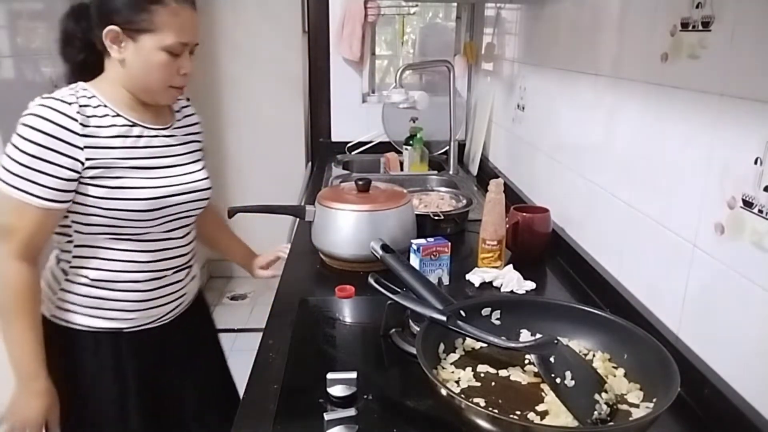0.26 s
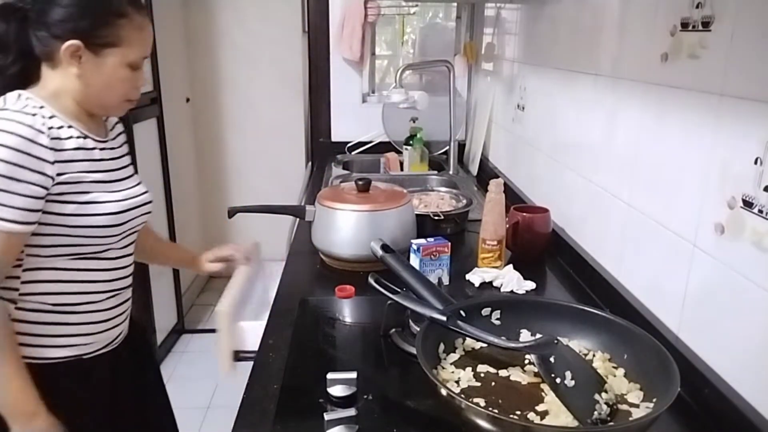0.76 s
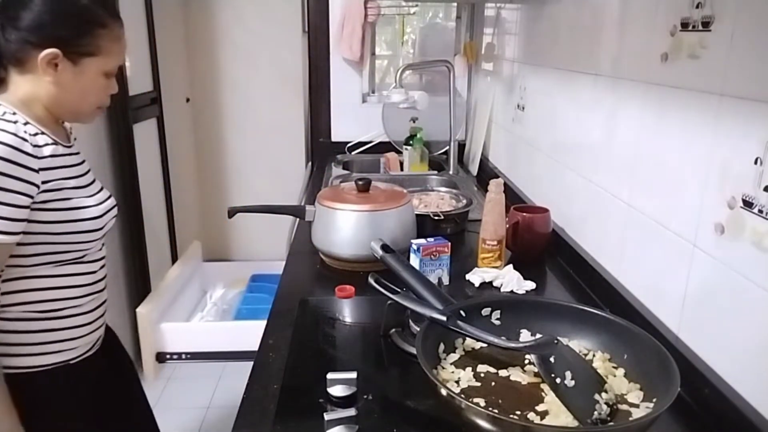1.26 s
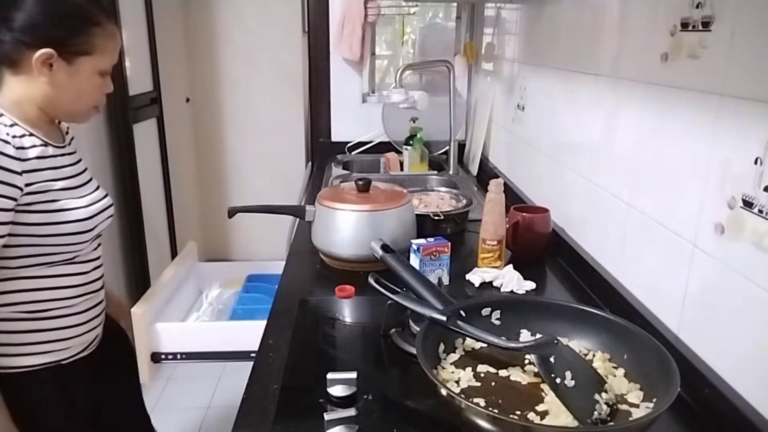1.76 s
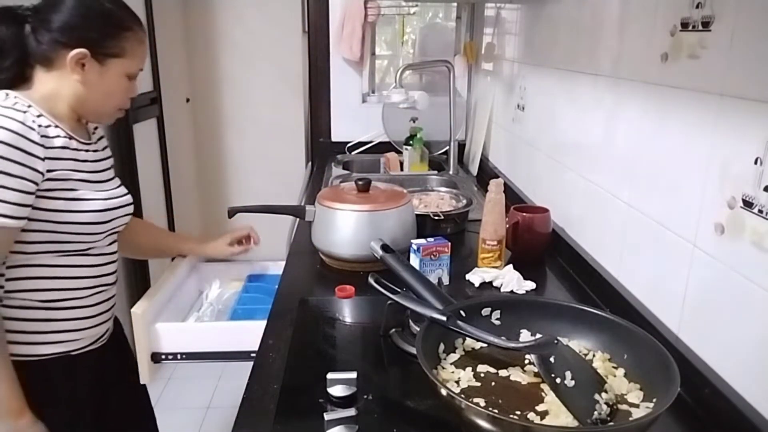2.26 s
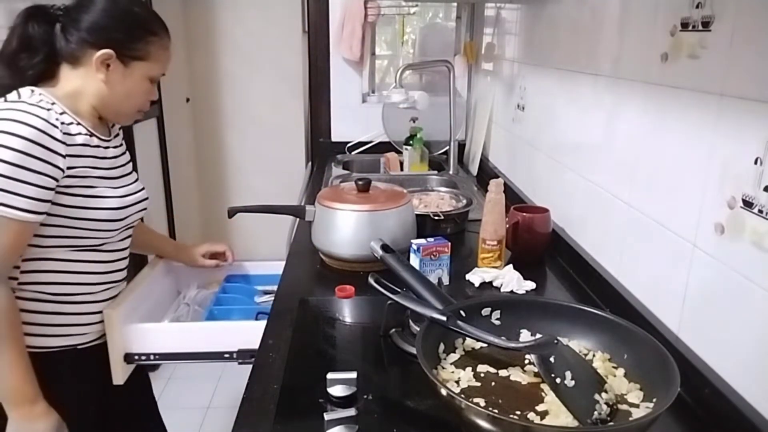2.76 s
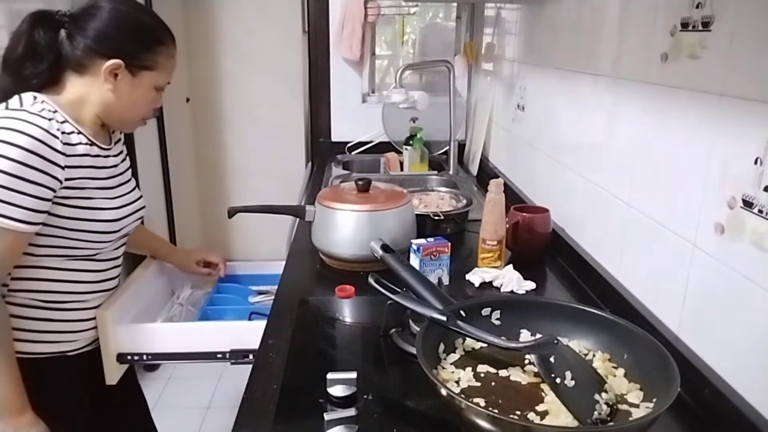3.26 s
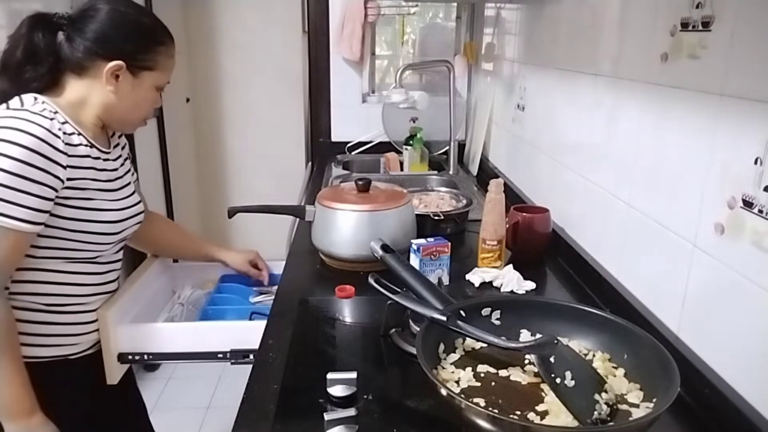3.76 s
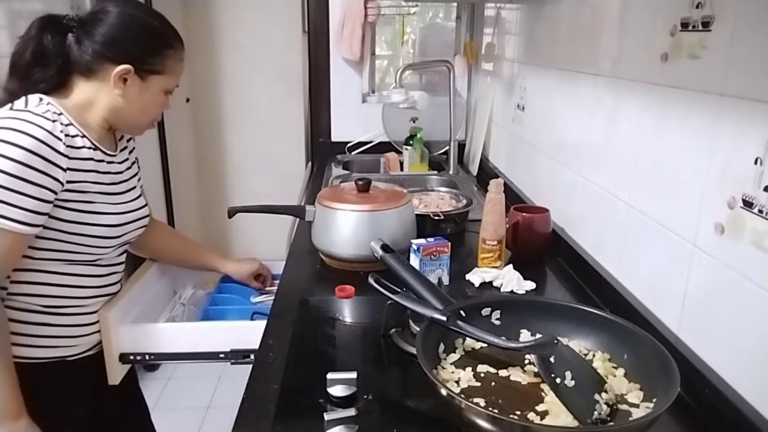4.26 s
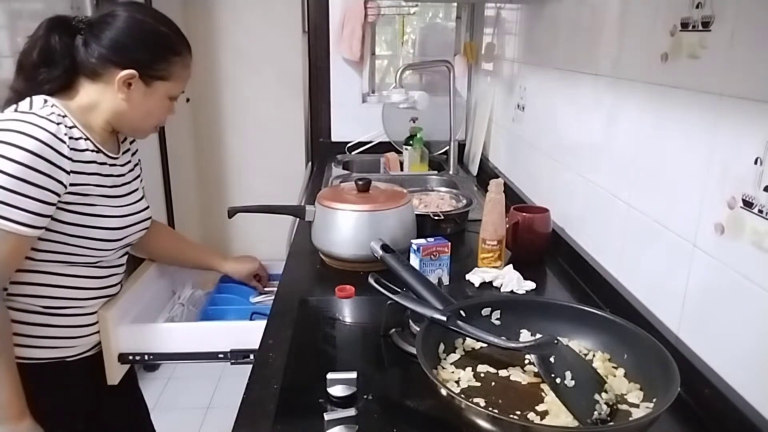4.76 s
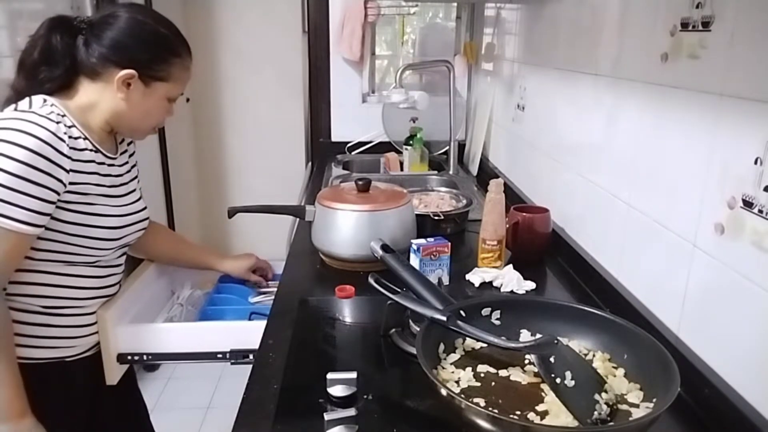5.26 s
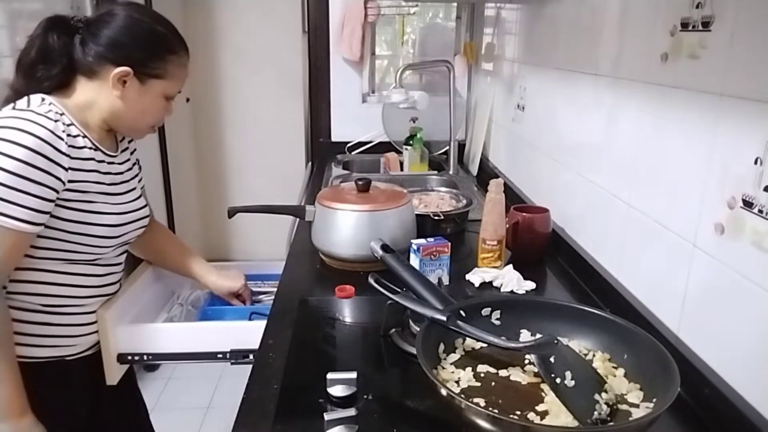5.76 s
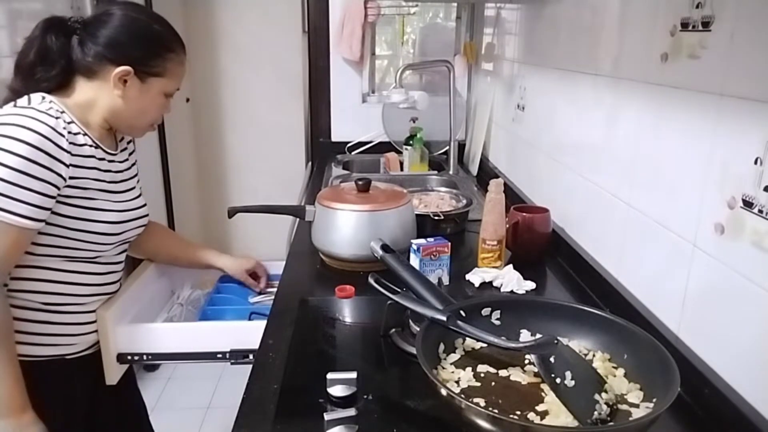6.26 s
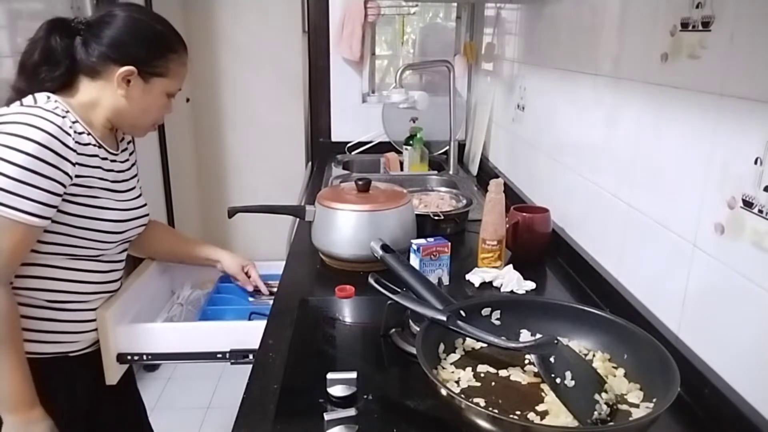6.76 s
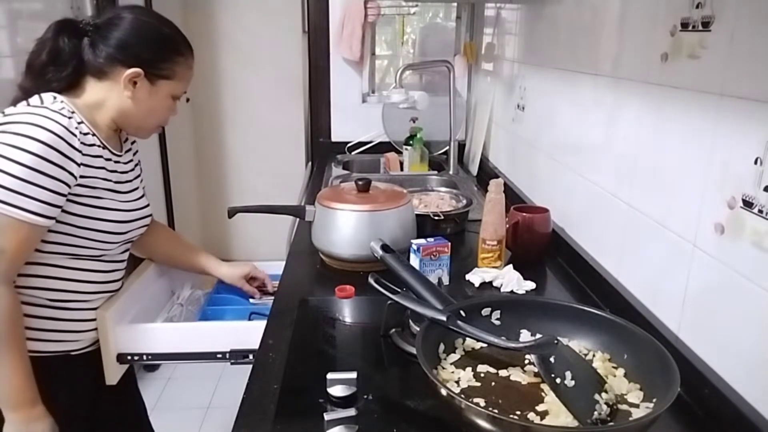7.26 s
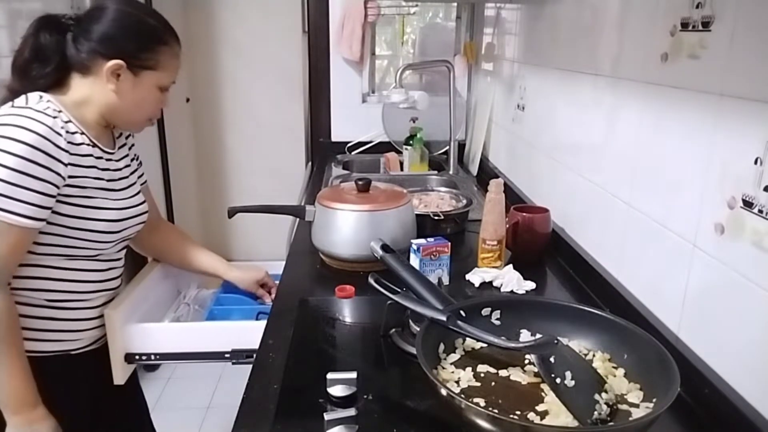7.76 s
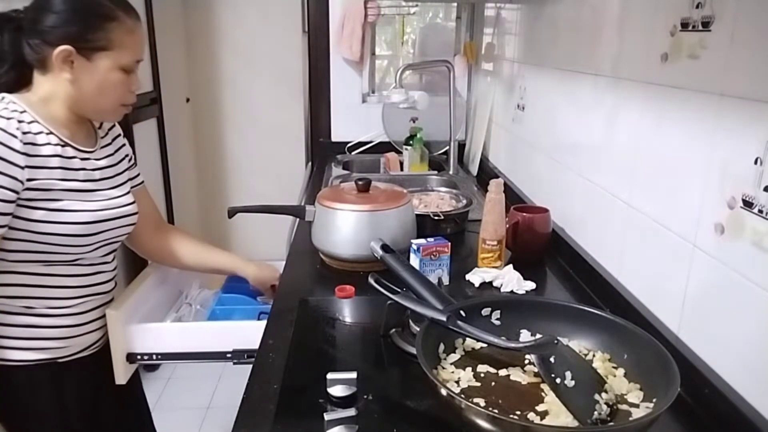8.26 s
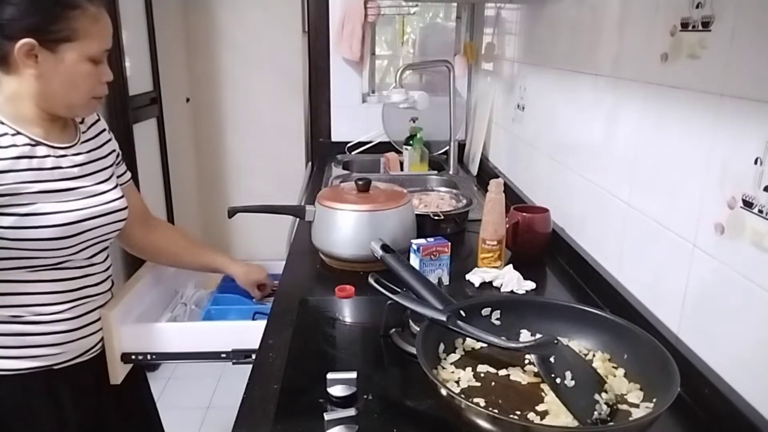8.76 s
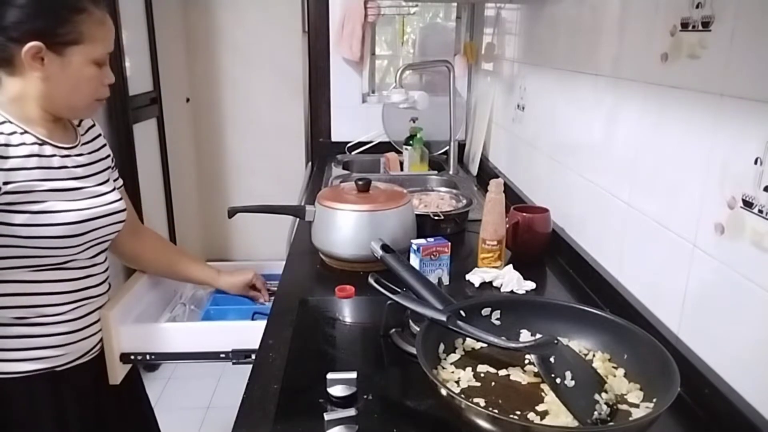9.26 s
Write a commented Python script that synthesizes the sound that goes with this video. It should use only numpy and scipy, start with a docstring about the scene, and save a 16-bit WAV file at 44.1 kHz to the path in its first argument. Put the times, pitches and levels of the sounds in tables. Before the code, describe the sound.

A wooden drawer's runners scrape and rumble briefly, then only gentle frying crackle and room rush remain. Spoons, forks and knives are then picked through in a hollow plastic tray, with quick rebounding clacks, short bright rings and light dragging. The loudest clatters come before the middle and about two thirds through. Short hard-walled kitchen echo; the frying is closer to the microphone but faint.

```python
"""A hand rummages through steel cutlery in the plastic tray of a kitchen drawer it has just rolled open.
Every contact is struck noise plus decaying sines in three layers: tray, drawer and ringing steel.
Random clicks, coloured and echoed by a small tiled room, make the rolling runners and dragged cutlery.
Close by, garlic sizzles quietly in a frying pan: fizz, crackles and spits that ring the pan's bowl.
The low rush of the room lies beneath."""
import sys
import numpy as np
from scipy import signal
from scipy.fft import rfft, irfft, next_fast_len
from scipy.io import wavfile

SR = 44100
rng = np.random.default_rng(int(sys.argv[2]) if len(sys.argv) > 2 else 0)


def to_wav(s):
    """Save 16-bit WAV."""
    ch = np.atleast_2d(s).T  # columns
    pcm = np.round(np.clip(ch, -1, 1) * 32767)  # PCM
    wavfile.write(sys.argv[1], SR, pcm.astype(np.int16))


N = 418905

# Lengths in samples: a whole hit, its ringing part, the first 40 ms by which hits are levelled
HIT_SIZE, RING_SIZE, LEVEL_SIZE = 18000, 14000, 1764
HIT_TIME = np.arange(HIT_SIZE) / SR

# Room and output
KITCHEN_T60_S, WALL_ECHO_S = 0.33, 0.012
CUTOFF_HZ = 15600
# Spectrum of the room's low rush: pitch_hz [Hz], level_db [dB, relative]
ROOM_TONE_COLOUR = [(12, -57), (20, -18), (103, -5), (163, -5), (245, -4.5), (449, -11), (744, -9),
                    (874, -11.5), (1390, -14), (1510, -21), (1640, -13.5), (1960, -22.5), (2500, -16.5),
                    (3250, -43), (5500, -120)]
ROOM_TONE_DB = -60.5

# Resonances of the pan's bowl: pitch_hz [Hz], width_hz [Hz], level_db [dB, relative]
PAN_MODES = [(3325, 120, 7), (4054, 130, 4.5), (4860, 120, 5), (6030, 200, 3), (6470, 130, 3),
             (6900, 150, 3), (7320, 150, 5)]
# Spectrum of the frying: pitch_hz [Hz], level_db [dB, relative]
SIZZLE_COLOUR = [(1200, -3), (2100, -16), (2700, -4), (3600, -3), (5200, -5), (6400, -2.5), (7500, -1),
                 (8300, -7), (9300, -20), (12000, -12), (13500, -12), (15300, -7)]
# Spits of oil at set times: start_s [s], level_db [dB, before the spit trim], pitch_hz [Hz]
SET_SPITS = [(1.675, -39, 3520), (1.76, -42, 7310), (2.4073, -34, 6500), (3.31, -40.5, 7200),
             (3.97, -36, 6150), (4.454, -39.5, 4850), (4.582, -44, 4080), (7.6842, -40.5, 3330),
             (7.947, -39.5, 7310), (9.457, -42, 7200)]
# Further spits at random times: mean level and its spread, before the spit trim
RANDOM_SPIT_DB, RANDOM_SPIT_SPREAD_DB = -42, 0.4
SPIT_TRIM_DB = -8.0

# Runners as the drawer is pulled open: start_s [s], level_db [dB, before the rumble and rail trims]
ROLL = [(0.2, -81), (0.322, -48), (0.606, -51.5), (0.642, -41), (0.836, -46.5), (0.864, -52), (0.9, -50),
        (1.1, -78)]
# Spectrum of the rolling: pitch_hz [Hz], level_db [dB, relative]
ROLL_COLOUR = [(90, -3), (150, -22), (220, 8), (290, 5.5), (370, -1.5), (470, -12.5), (620, -5),
               (950, -31.5), (1500, -41), (2400, -42), (4000, -59)]
# A later nudge a little further: start_s [s], length_s [s, before its release], level_db [dB, as in ROLL]
NUDGE = (2.5, .07, -54)
# Runners scrape as the drawer breaks free: start_s [s], length_s [s, before its release], level_db [dB]
SCRAPE = (.25, 0.046, -57)
# Spectrum of the scrape: pitch_hz [Hz], level_db [dB, relative]
SCRAPE_COLOUR = [(500, 0), (750, 8.5), (1050, 4), (1500, -6), (1900, -6), (2300, -8), (3200, -28)]
RUMBLE_DB, RAIL_DB = -2.5, -17.5   # roller rumble and rail hiss, relative to the runners
# The drawer jolts on its rollers: start_s [s], level_db [dB], pitch_hz [Hz]
JOLTS = [(.33, -46, 214), (.635, -54, 256), (0.904, -50.5, 237), (5.995, -52.5, 260)]
# Further roller bumps at random times: level relative to ROLL, and middle pitch
BUMP_DB, BUMP_HZ = -6, 264.4

# Clear tones of single parts that ring on alone: start_s [s], pitch_hz [Hz], level_db [dB], t60_s [s]
LOOSE_RINGS = [(.79, 917, -42.5, 0.084), (1.205, 1026, -51.5, 0.36), (1.205, 483, -54, 0.27),
               (2.411, 5940, -43, 0.13), (3.606, 1466, -28, 0.073), (3.609, 7750, -31, 0.18),
               (4.891, 908, -37, 0.18), (4.892, 2280, -46.5, 0.14), (5.752, 5470, -40.5, 0.14),
               (5.768, 699, -30.5, 0.29), (6.408, 7370, -26, 0.34), (6.487, 8857, -37, 0.45),
               (6.526, 1140, -27.5, 0.29), (6.589, 3885, -31.5, 0.35), (6.66, 1440, -42, 0.82),
               (7.392, 497, -26, 0.2), (8.236, 3860, -39, 0.23), (8.349, 4020, -45, 0.33)]
# Soft knocks of a handle rocking on the tray: start_s [s], level_db [dB], pitch_hz [Hz]
SOFT_KNOCKS = [(3.954, -49.5, 780), (4.286, -48, 737), (4.321, -46.5, 756), (4.331, -49, 890),
               (5.352, -37, 763), (6.895, -51.5, 734), (6.929, -52, 695), (7.051, -40.5, 764)]

# The hand drags cutlery over the tray: start_s [s], length_s [s, before release],
# level_db [dB, before the slip and graze trims]
STROKES = [(3.807, 0.27, -37.5), (4.42, 0.21, -46), (6.7, 0.43, -48.5), (7.5, 0.15, -51), (8.86, 0.76, -49)]
STROKE_ATTACK_S, STROKE_RELEASE_S = 0.067, 0.21
SLIP_DB, GRAZE_DB = -11, -15.5   # handles on plastic, steel on steel
GRAZE_HARDNESS_HZ = 6760

# Modes of the plastic tray: pitch_hz [Hz], level_db [dB, relative], t60_s [s]
TRAY_MODES = [(490, 6.5, 0.082), (593.5, -1.5, 0.46), (759, 2.5, 0.37), (805, 2, 0.088), (883, -2, 0.12),
              (925, 1, 0.26), (1163, -8.5, 0.14), (1167, 3, 0.3), (1192, 2, 0.23), (1464, 13, 0.17),
              (1508, 11, 0.091)]
# Modes of the wooden drawer: pitch_hz [Hz], level_db [dB, relative], t60_s [s]
DRAWER_MODES = [(194, -6, 0.28), (234, 8, 0.085), (347, 2, 0.15), (429.5, 6, 0.32)]
# Modes of a spoon: pitch_hz [Hz], level_db [dB, relative], t60_s [s]
SPOON = [(2485, -7, 0.099), (3020, -10, 0.17), (3470, -25, .2), (4070, -9, 0.2), (5930, 8, 0.037),
         (5916, -12, 0.23), (7310, -19, .25), (7720, -2, 0.2), (8200, -13, 0.11), (9800, -15, 0.091),
         (11900, -19, 0.2), (15120, -12, .12)]
# Modes of a fork: pitch_hz [Hz], level_db [dB, relative], t60_s [s]
FORK = [(2360, 5, 0.098), (2920, -1, 0.28), (3800, 0, 0.31), (4030, -19, .3), (5700, -10, 0.18),
        (8200, -17, .3), (10440, -9, 0.27), (10885, -21, .35), (11600, -9, .3), (15200, -5, .2)]
# Modes of a knife: pitch_hz [Hz], level_db [dB, relative], t60_s [s]
KNIFE = [(2360, 1.5, 0.12), (2920, -19, 0.38), (3700, -2, 0.41), (4040, 2, 0.1), (4200, -3, 0.16),
         (5660, -1, 0.35), (6700, -21, 0.13), (7200, 0, .2), (11900, -29, 0.11), (11900, -7, .2),
         (12740, -17, 0.19), (14680, -13, 0.18), (15190, -8, .22)]
# Modes of a heap of cutlery: pitch_hz [Hz], level_db [dB, relative], t60_s [s]
HEAP = [(2400, -11, .25), (2690, -10, .25), (3690, -6, .28), (3924, -1, .33), (4172, -7, .28),
        (5211, -5, .3), (5803, -5, .28), (6610, -5, .3), (7364, -3, .27), (7504, -7, .27), (8860, -9, .2),
        (11680, -8, .25), (12736, -9, .25), (13856, -9, .25), (14147, -8, .3), (14642, -5, .2),
        (15191, -8, .2)]
# What the hand is moving: start_s [s], modes [a mode table above]
IN_HAND = [(0, SPOON), (5, FORK), (6.2, HEAP), (7, KNIFE)]
# Contact hardness for each row of IN_HAND: cutoff_hz [Hz]
HARDNESS_HZ = [6700, 13000, 19000, 15500]
# Crowd of damped modes in the drawer: pitch_hz [Hz], level_db [dB, relative]
DRAWER_CLACK = [(90, -39), (140, -37), (185, 6), (260, -12.5), (350, 14), (440, -3), (540, -20), (800, -47)]
# Crowd of damped modes in the tray: pitch_hz [Hz], level_db [dB, relative]
TRAY_CLACK = [(300, -2), (460, -1), (600, 0.5), (770, 4.5), (1050, -1.5), (1200, -3.5), (1600, -3.5),
              (1900, -5), (2600, -46)]
# Crowd of damped modes in the steel: pitch_hz [Hz], level_db [dB, relative]
STEEL_CLACK = [(1300, 4), (2000, -4.5), (2450, 3), (3100, -2), (3900, 4.5), (4900, -4.5), (6300, -2),
               (7500, -1.5), (8400, -6.5), (9500, -19.5), (10800, -16.5), (11800, -9), (13000, -10),
               (15200, -7.5)]
# A piece drops or is pushed: start_s [s], tray_db, drawer_db, steel_db [dB, before the material trims],
# knock_hz [Hz, centre of the first knock], settle_s [s, until the last rebound]
CLATTERS = [(3.606, -33.5, -57, -40, 1240, 0.048), (3.682, -35, -54, -48, 880, .011),
            (3.698, -26.5, -52, -33.5, 960, .02), (3.71, -21, -42, -30, 990, 0.019),
            (3.743, -27.5, -54, -37.5, 830, 0.027), (4.028, -37, -63, -40, 920, .05),
            (4.215, -45.5, -75, -51.5, 900, 0.041), (4.858, -49, -65, -56, 970, .02),
            (4.892, -42.5, -71, -53.5, 1070, 0.055), (5.738, -44, -52, -59, 880, .012),
            (5.753, -42.5, -53, -45.5, 800, .01), (5.768, -35.5, -55, -44, 795, 0.037),
            (6.333, -42.5, -56, -55.5, 900, 0.032), (6.382, -38.5, -58, -46, 820, 0.015),
            (6.4, -23, -38, -29.5, 830, 0.015), (6.413, -29, -35, -26.5, 860, 0.039),
            (6.457, -32, -37.5, -36.5, 775, .02), (6.486, -29.5, -43, -32.5, 1010, 0.032),
            (6.526, -24, -37, -29.5, 850, 0.022), (6.561, -27, -34.5, -27.5, 860, .02),
            (6.59, -31, -41, -35, 870, 0.038), (6.653, -31, -52, -38, 940, 0.041),
            (7.143, -43.5, -47, -53, 955, 0.033), (7.28, -48, -54, -50, 1250, .02),
            (7.326, -41, -49, -46.5, 950, 0.023), (7.359, -35.5, -51, -37, 930, 0.026),
            (7.392, -25, -34, -36, 895, .014), (7.464, -41.5, -60, -62, 830, 0.054),
            (7.526, -43.5, -53, -57.5, 740, 0.058), (7.703, -45, -52.5, -50.5, 1000, 0.05),
            (8.056, -45.5, -58.5, -54.5, 1210, 0.012), (8.207, -42.5, -46, -47, 965, 0.016),
            (8.235, -34, -40.5, -40, 950, 0.023), (8.349, -33.5, -44.5, -39, 1030, 0.041),
            (8.513, -37, -48, -40, 850, 0.028), (8.572, -47, -55, -50, 790, .015),
            (9.089, -44.5, -58, -53.5, 880, .03), (9.135, -48, -60, -53.5, 890, .025),
            (9.233, -49.5, -58, -58, 940, 0.031), (9.303, -42, -54.5, -44.5, 850, 0.013),
            (9.314, -40.5, -66, -45, 1120, 0.027)]
# Mean loss at each rebound: tray_db, drawer_db, steel_db [dB]
REBOUND_LOSS_DB = [4.5, 4.5, 4.5]
REBOUND_GAP_SHARE = .75   # each gap as a share of the one before, on average
REBOUND_SPREAD_DB = 1
KNOCK_SPREAD_OCTAVES = 0.27   # a rebound lands on another spot of the tray
STEEL_RING_DB, STEEL_NEIGHBOURS_DB = -4, -2   # own modes and neighbours' modes, relative to the clack


def from_db(db):
    """Decibels to gain."""
    return 10 ** (np.asarray(db) / 20)


def rms_one(x, size=None):
    """Scale so that the first size samples have rms 1."""
    return x / np.sqrt(np.mean(x[:size] ** 2) + 1e-20)


def decay(t60):
    """An envelope that falls 60 dB in t60 seconds."""
    return from_db(-60 * HIT_TIME / max(t60, 1e-3))


def add(track, start_s, sound):
    """Mix a sound into the track from start_s seconds on."""
    at = max(int(start_s * SR), 0)
    track[at:at + len(sound)] += sound[:N - at]


def hit_noise():
    """White noise as long as one hit."""
    return rng.standard_normal(HIT_SIZE)


def colour(x, spectrum, emphasis=np.ones_like):
    """Filter a sound to a spectrum of (Hz, dB) points, times a gain that depends on frequency."""
    size = next_fast_len(len(x))
    hz = np.maximum(np.fft.rfftfreq(size, 1 / SR), 1)
    points, levels = np.transpose(spectrum)
    above_db = levels[-1] if points[-1] > 1e4 else -80
    level_db = np.interp(np.log(hz), np.log(points), levels, left=-70, right=above_db)
    return irfft(rfft(x, size) * from_db(level_db) * emphasis(hz), size)[:len(x)]


def hump(hz, centre_hz, octaves):
    """A broad resonance on a log-frequency axis."""
    return 1 / np.sqrt(1 + (np.log2(hz / centre_hz) / octaves) ** 4)


def grains(per_s, spread_db):
    """Random clicks of either polarity, of uneven size where spread_db is above zero."""
    swell = np.minimum(rng.exponential(1, N), 5)
    sizes = from_db(spread_db * swell) * rng.choice([-1, 1], N)
    return sizes * (rng.random(N) < per_s / SR)


def level_curve(rows):
    """Gain over time from (s, dB) rows, silent outside them."""
    start_s, level_db = np.transpose(rows)
    return np.interp(np.arange(N) / SR, start_s, from_db(level_db), left=0, right=0)


def push(start_s, length_s, level_db, attack_s, release_s):
    """Gain of one movement: it gathers speed, holds until its length is over and runs out."""
    t = np.arange(N) / SR - start_s
    gather = np.clip(t / attack_s, 0, 1)
    run_out = np.clip(1 - (t - length_s) / release_s, 0, 1)
    return from_db(level_db) * gather * run_out


def kitchen(x, wet_db):
    """Direct sound plus the diffuse echo of the tiled walls, as decaying noise."""
    echo = hit_noise() * decay(KITCHEN_T60_S) * (1 - decay(0.0051))
    wet = signal.fftconvolve(x, echo / np.linalg.norm(echo))[:len(x)]
    return x + from_db(wet_db) * wet


def wall_echo(x, echo_db):
    """The facing wall returns one distinct reflection."""
    out = x.copy()
    add(out, WALL_ECHO_S, from_db(echo_db) * x)
    return out


def chime(modes, emphasis, spread_db):
    """Decaying sines; each spot that is struck favours other modes."""
    hz, level_db, t60 = np.transpose(modes)
    strength = from_db(level_db + spread_db * rng.standard_normal(len(hz))) * emphasis(hz)
    t = HIT_TIME[:RING_SIZE].astype(np.float32)
    fade_rate = np.log(1000) / np.maximum(t60, .01)
    phases = 2 * np.pi * rng.random(len(hz))
    # One row per mode; single precision keeps it quick
    turn, fade, phase = np.float32([2 * np.pi * hz, fade_rate, phases])[:, :, None]
    ring = strength.astype(np.float32) @ (np.sin(turn * t + phase) * np.exp(-fade * t))
    return rms_one(np.pad(ring, (0, HIT_SIZE - RING_SIZE)), size=LEVEL_SIZE)


def room_rush():
    """The low rush of the room: steady noise with a dark spectrum."""
    return from_db(ROOM_TONE_DB) * rms_one(colour(rng.standard_normal(N), ROOM_TONE_COLOUR))


def pan_resonance(hz):
    """Gain of the pan's ringing bowl: a sum of narrow resonance peaks."""
    gain = 1
    for centre_hz, width_hz, level_db in PAN_MODES:
        gain = gain + (from_db(level_db) - 1) / (1 + (2 * (hz - centre_hz) / width_hz) ** 2)
    return gain


def sizzle_fizz():
    """Dense equal clicks of bursting bubbles, gently tinted by the pan."""
    tint = lambda hz: np.sqrt(pan_resonance(hz))
    return rms_one(colour(grains(per_s=5000, spread_db=0.0), SIZZLE_COLOUR, tint))


def sizzle_crackle():
    """Sparser uneven pops in nine pitch bands, ringing the pan and the room."""
    crackle = np.zeros(N)
    for centre_hz in np.geomspace(2800, 8500, num=9):
        band = lambda hz: pan_resonance(hz) * hump(hz, centre_hz, octaves=.25)
        pops = colour(grains(per_s=35, spread_db=2.6), SIZZLE_COLOUR, band)
        crackle += kitchen(pops, wet_db=3.0)
    return rms_one(crackle)


def random_spits(count):
    """Further spits at random times, each on one pan resonance: rows of start_s, level_db, pitch_hz."""
    start_s = (np.arange(count) + rng.random(count)) / count * N / SR
    level_db = RANDOM_SPIT_DB + RANDOM_SPIT_SPREAD_DB * rng.standard_normal(count)
    pitch_hz = rng.choice([hz for hz, _, _ in PAN_MODES], count)
    return list(zip(start_s, level_db, pitch_hz))


def oil_spits():
    """Each spit is a short noise burst that rings the bowl around its own pitch."""
    spits = np.zeros(N)
    for start_s, level_db, pitch_hz in SET_SPITS + random_spits(count=22):
        pitched = lambda hz: hump(hz, pitch_hz, octaves=0.43)
        burst = rms_one(colour(hit_noise(), SIZZLE_COLOUR, pitched) * decay(0.057), size=LEVEL_SIZE)
        bowl_modes = [(hz, mode_db, .07) for hz, _, mode_db in PAN_MODES]
        bowl = chime(bowl_modes, pitched, spread_db=7.0)
        spit = (burst + from_db(2.5) * bowl) * (1 - decay(0.0044))
        # Levelled over its first 6 ms
        add(spits, start_s, from_db(level_db + SPIT_TRIM_DB) * rms_one(spit, size=264))
    return kitchen(spits, wet_db=-9.0)


def frying():
    """Garlic in the pan: a fine fizz, sparser crackles and single spits of oil."""
    return from_db(-60.5) * sizzle_fizz() + from_db(-59.5) * sizzle_crackle() + oil_spits()


def runners():
    """Rollers rumble and hiss along the rails as dense clicks; at first the rails scrape."""
    rumble = rms_one(kitchen(colour(grains(per_s=600, spread_db=3.5), ROLL_COLOUR), wet_db=0))
    scrape = rms_one(kitchen(colour(grains(per_s=230, spread_db=3.5), SCRAPE_COLOUR), wet_db=6))
    rolling = level_curve(ROLL) + push(*NUDGE, attack_s=0.043, release_s=.08)
    scraping = from_db(RAIL_DB) * rolling + push(*SCRAPE, attack_s=0.048, release_s=0.29)
    return from_db(RUMBLE_DB) * rolling * rumble + scraping * scrape


def bumps(count):
    """Roller bumps at random times, as hard as the drawer runs: rows of start_s, level_db, pitch_hz."""
    times, levels = np.transpose(ROLL)
    start_s = times[0] + (times[-1] - times[0]) * (np.arange(count) + rng.random(count)) / count
    level_db = np.interp(start_s, times, levels) + BUMP_DB
    pitch_hz = BUMP_HZ * 2 ** (0.23 * rng.standard_normal(count))
    return list(zip(start_s, level_db, pitch_hz))


def jolts():
    """The drawer box booms briefly at each jolt: three low, fast-fading modes."""
    out = np.zeros(N)
    for start_s, level_db, pitch_hz in JOLTS + bumps(count=12):
        box_modes = [(pitch_hz, 0, .11), (pitch_hz * 1.45, -9, .09), (pitch_hz * .68, -11, .1)]
        boom = chime(box_modes, np.ones_like, spread_db=3.5) * (1 - decay(0.039))
        add(out, start_s, from_db(level_db) * rms_one(boom, size=LEVEL_SIZE))
    return out


def loose_rings():
    """Single decaying sines from the rails and from pieces left free to swing."""
    out = np.zeros(N)
    for start_s, pitch_hz, level_db, t60 in LOOSE_RINGS:
        envelope = decay(t60) * (1 - decay(0.004)) ** 3   # soft onset
        add(out, start_s, from_db(level_db) * np.sin(2 * np.pi * pitch_hz * HIT_TIME) * envelope)
    return out


def soft_knocks():
    """A blunt touch wakes one panel of the tray, with a weak overtone and a faint tick of steel."""
    out = np.zeros(N)
    for start_s, level_db, pitch_hz in SOFT_KNOCKS:
        panel_modes = [(pitch_hz, 0, .05), (pitch_hz * 1.78, -12, .05)]
        panel = chime(panel_modes, np.ones_like, spread_db=0.0)
        near_pitch = lambda hz: hump(hz, pitch_hz, octaves=0.32)
        tail = rms_one(colour(hit_noise(), TRAY_CLACK, near_pitch) * decay(0.24), size=LEVEL_SIZE)
        tick = rms_one(colour(hit_noise(), STEEL_CLACK) * decay(0.098), size=LEVEL_SIZE)
        knock = rms_one((panel + from_db(-11) * tail) * (1 - decay(.035)), size=LEVEL_SIZE)
        add(out, start_s, from_db(level_db) * (knock + from_db(-19.0) * tick))
    return wall_echo(out, echo_db=-9.0)


def dragging():
    """Handles stick and slip on the plastic and graze one another, as two streams of clicks."""
    effort = sum(push(*stroke, STROKE_ATTACK_S, STROKE_RELEASE_S) for stroke in STROKES)
    slips = rms_one(kitchen(colour(grains(per_s=440, spread_db=4.0), TRAY_CLACK), wet_db=6.5))
    soft = lambda hz: 1 / np.hypot(1, (hz / GRAZE_HARDNESS_HZ) ** 2)
    grazes = rms_one(kitchen(colour(grains(per_s=120, spread_db=1.6), STEEL_CLACK, soft), wet_db=3))
    return effort * (from_db(SLIP_DB) * slips + from_db(GRAZE_DB) * grazes)


def chance_modes(spectrum, count, t60):
    """Modes of whatever else is touched: random pitches, as strong as the spectrum there."""
    points, levels = np.transpose(spectrum)
    pitches = rng.uniform(points[1], points[-2], count)
    fades_s = t60 * rng.uniform(.6, 1.4, count)
    return list(zip(pitches, np.interp(pitches, points, levels), fades_s))


def strike(spectrum, modes, emphasis, ring_db, others_db, clack_t60, room_db, rise_s, count):
    """One blow: a noisy clack with its room tail, the body's own modes and those of its neighbours."""
    envelope = np.hypot(decay(clack_t60), from_db(room_db) * decay(KITCHEN_T60_S))
    clack = rms_one(colour(hit_noise(), spectrum, emphasis) * envelope, size=LEVEL_SIZE)
    ring = chime(modes, emphasis, spread_db=3.0)
    others = chime(chance_modes(spectrum, count, t60=0.13), emphasis, spread_db=4.0)
    blow = clack + from_db(ring_db) * ring + from_db(others_db) * others
    return rms_one(blow * (1 - decay(rise_s)), size=LEVEL_SIZE)


def contact(tray_db, drawer_db, steel_db, knock_hz, piece, hard_hz):
    """One touch sounds in the tray, in the drawer under it and in the steel."""
    spot = lambda hz: hump(hz, knock_hz, octaves=0.56)
    hardness = lambda hz: 1 / np.sqrt(1 + (hz / hard_hz) ** 4)
    tray = strike(TRAY_CLACK, TRAY_MODES, spot, ring_db=-3.0, others_db=2,
                  clack_t60=0.028, room_db=-11, rise_s=0.02, count=8)
    drawer = strike(DRAWER_CLACK, DRAWER_MODES, np.ones_like, ring_db=-3, others_db=-10,
                    clack_t60=.07, room_db=-4, rise_s=.015, count=4)
    steel = strike(STEEL_CLACK, piece, hardness, ring_db=STEEL_RING_DB, others_db=STEEL_NEIGHBOURS_DB,
                   clack_t60=.07, room_db=-1, rise_s=.018, count=24)
    # Material trims
    return from_db(tray_db - 3.5) * tray + from_db(drawer_db - 1.5) * drawer + from_db(steel_db - 0.9) * steel


def touches(settle_s, count):
    """A blow and its rebounds, on average quicker and weaker: rows of delay_s, three change_db, ratio."""
    k = np.arange(count + 1)
    timing, force, spot = rng.standard_normal((3, count + 1)) * (k > 0)   # the first blow is not varied
    delay = np.cumsum((k > 0) * REBOUND_GAP_SHARE ** k * np.exp(.15 * timing))
    change_db = REBOUND_SPREAD_DB * force[:, None] - np.outer(k, REBOUND_LOSS_DB)
    return zip(settle_s * delay / delay[-1], change_db, 2 ** (KNOCK_SPREAD_OCTAVES * spot))


def piece_in_hand(at_s):
    """The modes and contact hardness of what the hand is moving at that time."""
    begun = [(modes, hz) for (start_s, modes), hz in zip(IN_HAND, HARDNESS_HZ) if start_s <= at_s]
    return begun[-1]


def cutlery():
    """Each piece lands, rebounds twice and settles."""
    out = np.zeros(N)
    for start_s, tray_db, drawer_db, steel_db, knock_hz, settle_s in CLATTERS:
        piece, hard_hz = piece_in_hand(start_s)
        for delay_s, change_db, ratio in touches(settle_s, count=2):
            levels_db = np.array([tray_db, drawer_db, steel_db]) + change_db
            add(out, start_s + delay_s, contact(*levels_db, knock_hz * ratio, piece, hard_hz))
    return out


def scene():
    """The drawer and the pan over the low rush of the room."""
    drawer = runners() + jolts() + loose_rings() + soft_knocks() + dragging() + cutlery()
    return (room_rush() + frying() + drawer)[None]


def record(dry):
    """A steep elliptic low-pass cuts the top."""
    low_pass = signal.ellip(12, .2, 90, CUTOFF_HZ, fs=SR, output="sos")
    return signal.sosfilt(low_pass, dry)


dry = scene()
out = record(dry)
to_wav(out)
```